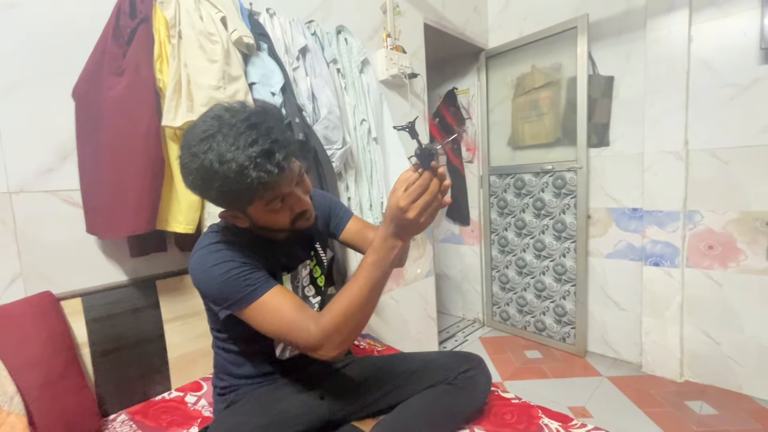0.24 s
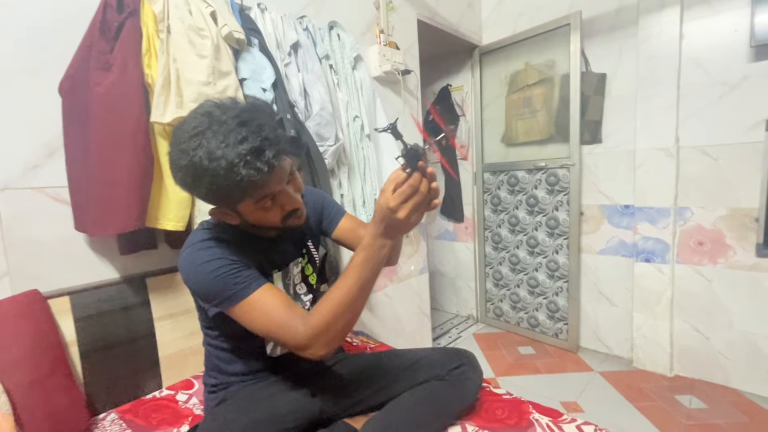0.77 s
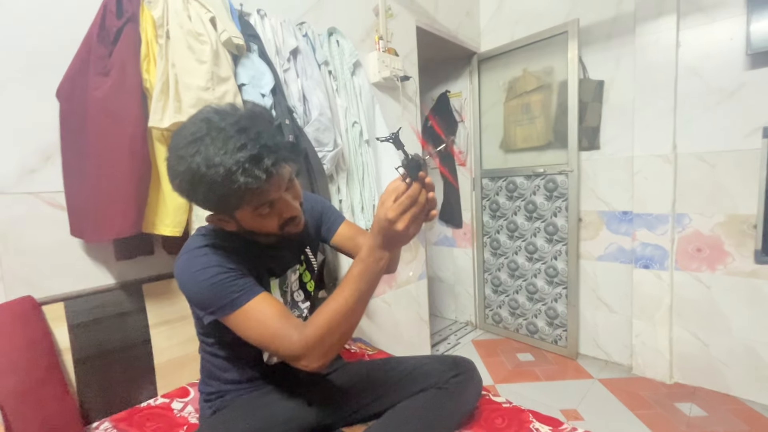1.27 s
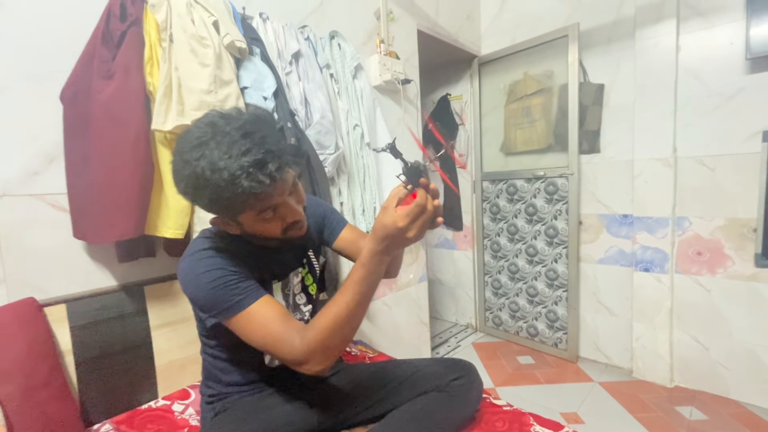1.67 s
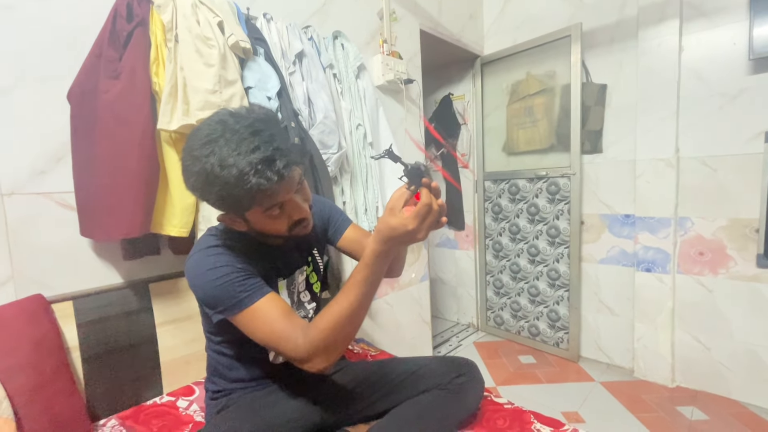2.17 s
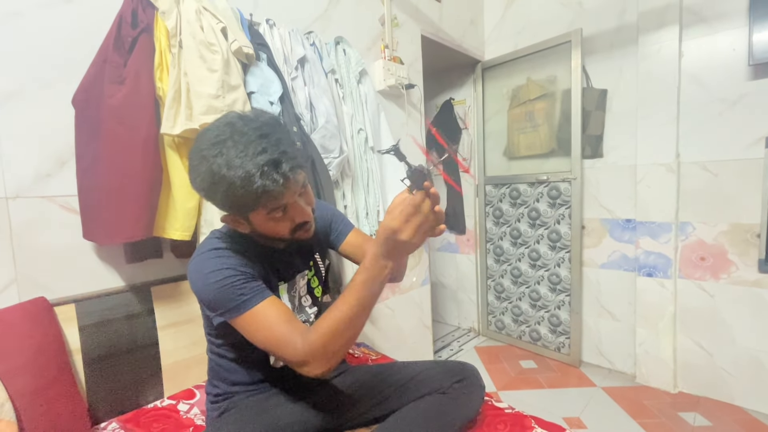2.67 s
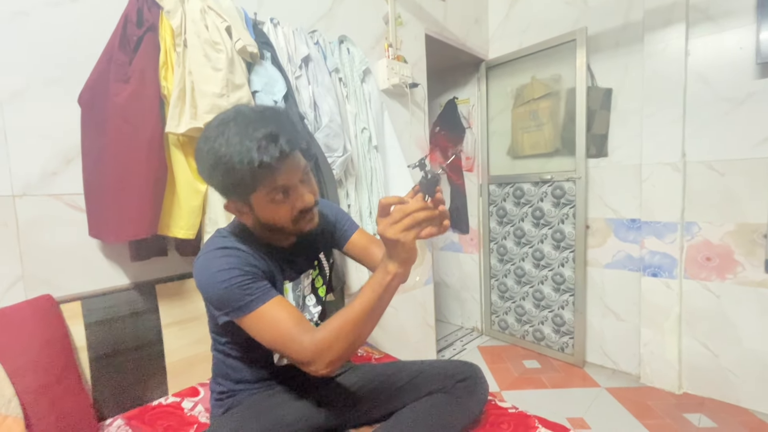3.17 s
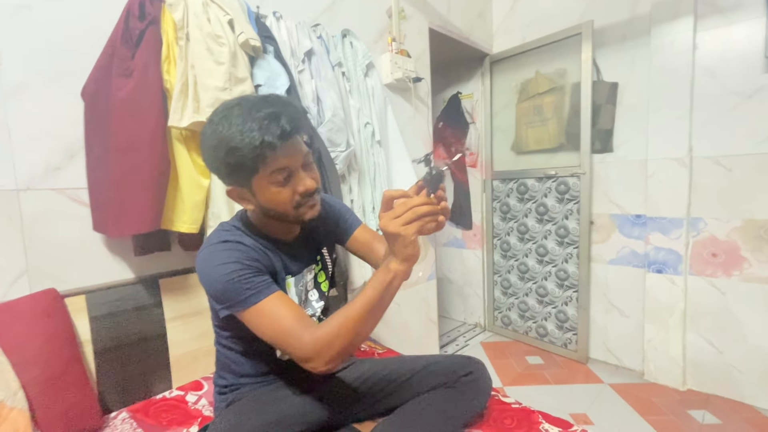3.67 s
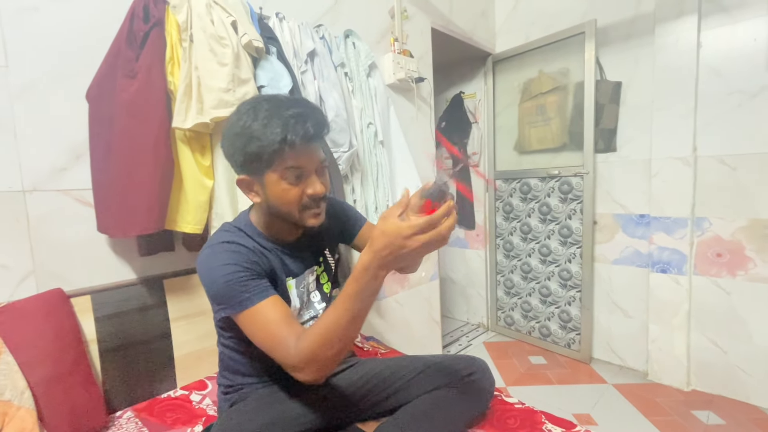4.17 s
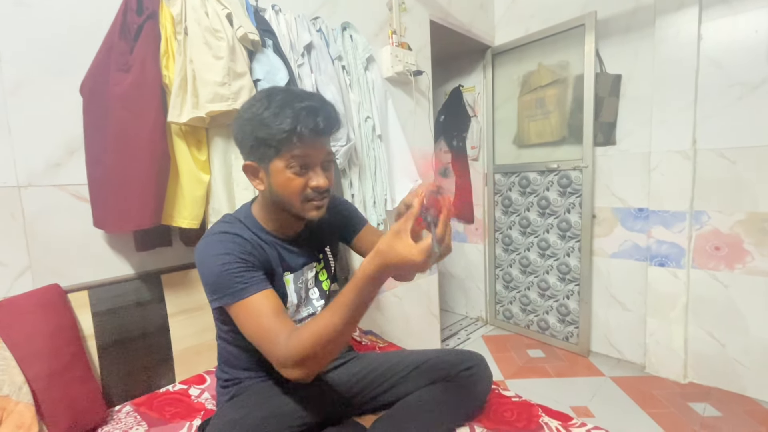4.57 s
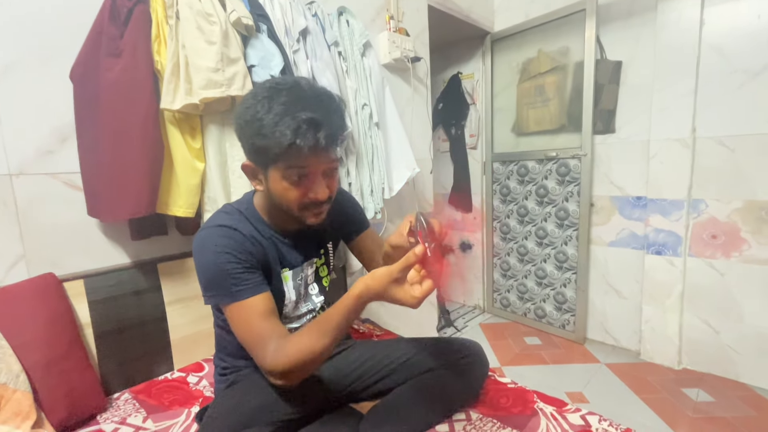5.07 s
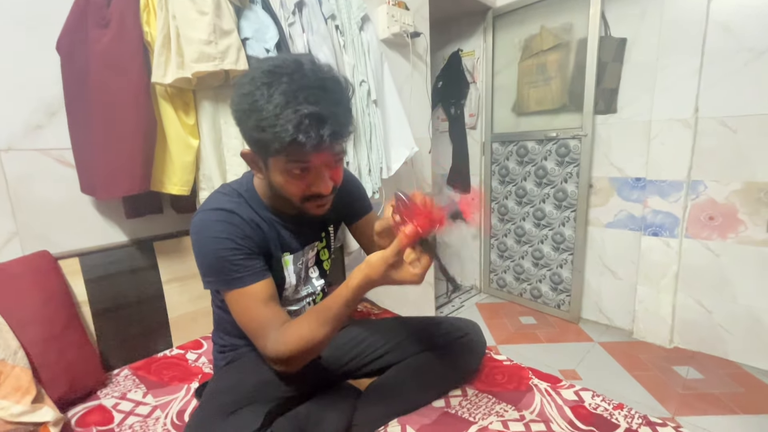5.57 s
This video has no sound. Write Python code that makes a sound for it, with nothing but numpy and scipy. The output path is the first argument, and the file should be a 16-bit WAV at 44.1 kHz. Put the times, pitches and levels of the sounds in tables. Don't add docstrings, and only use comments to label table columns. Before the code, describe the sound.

A small hand-held toy rotorcraft whirs close to a stereo microphone in a hard, tiled room, over a quiet low fan drone. Two thin gear whines, slightly apart in pitch, beat and waver with raspy buzz and airy rotor hiss. The pitch stays near one level at first, with a brief rise around 1.3 seconds and a dip near 1.6. At about 2.9 seconds it jumps higher and smoother, with a piercing squeal on top; four rapid dull finger taps come near 3.45. From 3.75 the whine sinks, growing shaky and strained after 4.2, then briefly surges upward before power cuts at about 4.7. The driven tone vanishes quickly, leaving a breathy, scraping whir with short bursts of gear rattle until about 5.1, fading as it slows. At roughly 5.8 seconds a sharp switch snap rings with tiny bounces, leaving only the fan's faint drone.

```python
import sys
import numpy as np
from scipy import signal
from scipy.fft import rfft, irfft
from scipy.io import wavfile

SR = 44100
rng = np.random.default_rng(int(sys.argv[2]) if len(sys.argv) > 2 else 0)


def store_wav(level_fs):
    pcm = np.round(np.clip(np.atleast_2d(level_fs), -1, 1) * 32767)
    wavfile.write(sys.argv[1], SR, pcm.T.astype(np.int16))


def rack_gain(trim_db):
    fader = np.asarray(trim_db, float)
    return 10 ** (fader / 20)


N = 256794
TIME_S = np.arange(N) / SR
BIN_HZ = np.fft.rfftfreq(N, 1 / SR)

POWER_OFF_S = 4.728
SINCE_OFF_S = np.clip(TIME_S - POWER_OFF_S, 0, None)
TEETH = 8
# hz, level_db_per_hz
SHELL_COLOUR = [(290, -23.5), (500, -17), (900, -25), (1350, -13.5), (1800, -12), (2300, -18.5),
                (2600, -12), (2900, -7), (4400, -6.5), (6500, -2), (10000, -7), (13300, -6.5),
                (13900, -5.5), (15200, -21.5)]


def rms_one(x):
    return x / np.sqrt(np.mean(x ** 2) + 1e-20)


def in_time(rows):
    start_s, *columns = np.transpose(rows)
    return [np.interp(TIME_S, start_s, column) for column in columns]


def at_hz(points, hz):
    point_hz, value = np.array(points)[:, :2].T
    return np.interp(np.log(hz + 1), np.log(point_hz), value)


def drift(rate_hz):
    r = np.exp(-2 * np.pi * rate_hz / SR)
    noise = rng.standard_normal(N + SR)
    return rms_one(signal.lfilter([1], [1, -2 * r, r * r], noise)[SR:])


def low_pass(x, order, cutoff_hz):
    return signal.sosfilt(signal.butter(order, cutoff_hz, fs=SR, output="sos"), x)


def high_pass(x, cutoff_hz):
    return signal.sosfilt(signal.butter(4, cutoff_hz, "high", fs=SR, output="sos"), x)


def resonate(x, hz, width_hz):
    r = np.exp(-np.pi * width_hz / SR)
    feedback = [1, -2 * r * np.cos(2 * np.pi * hz / SR), r * r]
    return signal.lfilter([(1 - r * r) / 2, 0, (r * r - 1) / 2], feedback, x)


def strike(start_s, peak_db, hz, t60_s):
    out, start = np.zeros(N), round(start_s * SR)
    t = np.arange(min(N - start, SR // 5)) / SR
    decay = rack_gain(peak_db - 60 * t / np.clip(t60_s, .002, .2))
    out[start:start + len(t)] = decay * np.sin(2 * np.pi * hz * t)
    return out


def coloured(spectrum, patchy_db, channels):
    bins = rfft(rng.standard_normal((channels, N))) * rack_gain(at_hz(spectrum, BIN_HZ))
    octave = np.clip(np.log2(BIN_HZ / 125 + 1e-9), 0, 7)
    total = 0
    for k in range(8):
        band = irfft(bins * np.sqrt(np.clip(1 - abs(octave - k), 0, 1)), N)
        total = total + band * rack_gain(patchy_db * drift(15.5))
    return rms_one(total)


def bells(rows):
    return sum(rack_gain(db) * np.exp(-((TIME_S - s) / half_length_s) ** 2) for s, db, half_length_s in rows)


def turn_angle(turns_per_s):
    return 2 * np.pi * np.cumsum(turns_per_s) / SR


def gears():
    # start_s, lead_turns_per_s
    second_lead = [(0, 25), (1, 26), (1.1, 21), (1.5, 22), (1.65, 26), (2.1, 26), (2.3, 21), (2.45, 21),
                   (2.6, 26), (2.9, 22.5), (4.07, 22.5), (4.4, 12)]
    # start_s, relative_tremble, roughness_db
    strain = [(0, .0008, 0), (2.85, .0008, 0), (2.95, .004, 2), (3.2, .0012, 0), (4.05, .0014, 0),
              (4.3, .007, 4), (4.55, .015, 8), (4.73, .006, 4)]
    powered = shaft_speed()
    tremble, strain_db = in_time(strain)
    speed = powered * np.exp(-SINCE_OFF_S / .32)
    second_speed = powered + in_time(second_lead)[0]
    angle = turn_angle(speed * (1 + tremble * drift(23.2)))
    second = turn_angle(second_speed * (1 + 2.5 * tremble * drift(26.4)))
    smooth = 1 / (1 + np.exp((462 - powered) / 4))
    loaded = np.exp(-SINCE_OFF_S / .004)
    humps = tooth_humps(angle)
    tones = mesh_tones(angle, second) + side_tones(angle, speed, smooth, strain_db)
    pressing = 1.104 * tones + rasp(humps, smooth, strain_db) + squeal(angle, second)
    return loaded * pressing + (1 - loaded) * coasting(angle, powered, humps)


def shaft_speed():
    # start_s, aim_turns_per_s, lag_s
    throttle = [(0, 386, .15), (.365, 422.5, .12), (.9, 419.9, .06), (1.24, 458, .05), (1.538, 387, .125),
                (2.012, 420.8, .12), (2.66, 419.4, .05), (2.89, 481, .113), (3.33, 473, .15),
                (3.75, 430, 1.1), (4.08, 380, .45), (4.275, 335, .26), (4.585, 560, .33)]
    speed = np.full(N, 422.7)
    for start_s, aim, lag_s in throttle:
        i = round(start_s * SR)
        speed[i:] = aim + (speed[i] - aim) * np.exp(-(TIME_S[i:] - start_s) / lag_s)
    return speed


def mesh_tones(angle, second):
    # peak_s, level_db, half_length_s
    first_sings = [(.13, -24, .05), (.35, -24, .05), (.72, -21, .16), (.95, -25, .1), (1.17, -20, .1),
                   (1.85, -29, .1), (2.3, -25, .2), (2.88, -18, .11), (3.15, -32, .07), (3.79, -19, .11),
                   (4.1, -23, .12), (4.42, -18, .03), (4.58, -21, .06)]
    # peak_s, level_db, half_length_s
    second_sings = [(.05, -28, 0.34), (.83, -23, 0.085), (1.45, -24, 0.069), (2.83, -40, 0.09),
                    (3.2, -28.5, 0.38), (3.62, -26, 0.081), (4.07, -28, 0.024), (4.24, -18, .03),
                    (4.36, -16.5, 0.021), (4.54, -36, 0.024), (4.66, -16, 0.024)]
    first_gain = (rack_gain(-31.5) + bells(first_sings)) * rack_gain(1.3 * drift(20))
    second_gain = (rack_gain(-30) + bells(second_sings)) * rack_gain(2.5 * drift(15.0) - 6.5)
    second_wave = np.sin(TEETH * second) + rack_gain(-41) * np.sin(2 * TEETH * second)
    return first_gain * np.sin(TEETH * angle) + second_gain * second_wave


def side_tones(angle, speed, smooth, strain_db):
    side_order = [1, 3.46, 4, 5, 6.094, 7, 11, 12.19, 14, 15, 16, 17]
    side_order_db = [-18, -19, -17, -11, -8, -7, -15, -13, -6, -3, -3, -7]
    tones = 0
    for k, order_db in zip(side_order, side_order_db):
        mode_db = 8 * np.exp(-((k * speed - 2735) / 75) ** 2)
        shell_db = at_hz(SHELL_COLOUR, k * speed) + mode_db - strain_db
        blur_db = -5 * (1 - smooth) * (k > 1.5 * TEETH)
        level_db = order_db + blur_db + shell_db - 21.0 + 3.03 * drift(16.5)
        tones = tones + rack_gain(level_db) * np.sin(k * angle + rng.uniform(0, 3.94))
    commutator = rack_gain(-41 - 2 * strain_db + 1.1 * drift(13.0)) * np.sin(3.047 * angle)
    boom = rack_gain(-47) * resonate(np.sin(angle), 476, 25)
    return tones + commutator + boom


def tooth_humps(angle):
    hump_order = [7.9, 14.5, 16.4]
    # half_width_hz, level_db
    hump_shape = [(306, -2), (648.15, 0.5), (410, 4.5)]
    humps = []
    for k, (width_hz, level_db) in zip(hump_order, hump_shape):
        wave = drift(width_hz) * np.sin(k * angle) + drift(width_hz) * np.cos(k * angle)
        humps.append(rack_gain(level_db) * wave)
    return humps


def rasp(humps, smooth, strain_db):
    level_db = -20.5 - 9 * smooth + 1 * drift(1.3)
    case = rack_gain(-0.5) * resonate(sum(humps[1:]), 6600, 2800)
    return rack_gain(level_db - 6.5) * (rack_gain(strain_db) * humps[0] + case)


def squeal(angle, second):
    rise_s, fall_s, edge_s = 2.65, 4.1, 0.088
    raised = np.tanh((TIME_S - rise_s) / edge_s) - np.tanh((TIME_S - fall_s) / edge_s)
    level_db = -31 + 7.5 / 2 * raised
    first_third = (0.45 + drift(240)) * np.sin(3 * TEETH * angle)
    second_third = (0.11 + 2.0 * drift(380)) * np.sin(3 * TEETH * second)
    return rack_gain(level_db - 0.5) * resonate(first_third + second_third, 11440, 340)


def coasting(angle, powered, humps):
    sliding = drift(410) * np.sin(2 * TEETH * angle) + drift(500) * np.cos(2 * TEETH * angle)
    sliding = high_pass(sliding + .5 * humps[0], 2600)
    sliding_db = -30.5 - 23 * SINCE_OFF_S + 4.1 * drift(30)
    held = turn_angle(powered * .98)
    fade = rack_gain(-23) * np.exp(-SINCE_OFF_S / 0.026)
    lingering = fade * (1 + 0.36 * drift(60)) * np.sin(TEETH * held)
    return rack_gain(sliding_db) * sliding + lingering


def rush():
    # start_s, level_db
    rush_level = [(0, -17.5), (4.2, -16), (4.55, -18.5), (4.72, -17), (4.78, -20.5), (4.85, -14),
                  (5.05, -14), (5.2, -20.5), (5.82, -37)]
    hiss = coloured(SHELL_COLOUR, patchy_db=1.0, channels=3)
    dull = low_pass(hiss, 2, 5500)
    bright = np.exp(-SINCE_OFF_S / 0.32)
    brush_loss_db = -7 * (1 - np.exp(-SINCE_OFF_S / 0.0023))
    chop = 1 + 0.12 * drift(240)
    return rack_gain(in_time(rush_level)[0] + brush_loss_db - 8.5) * chop * (dull + bright * (hiss - dull))


def backlash():
    # peak_s, level_db, half_length_s
    knock_bursts = [(4.756, -47, 0.01), (4.783, -25.5, 0.01), (4.823, -20, 0.017), (4.876, -24, 0.0068),
                    (4.905, -29, 0.0082), (4.984, -27, 0.015), (5.012, -30, 0.01), (5.05, -42, 0.011),
                    (5.124, -35, .01)]
    sizes = rack_gain(2.4 * np.minimum(rng.exponential(1, N), 4)) * rng.choice([-1, 1], N)
    impacts = sizes * (rng.random(N) < 2500 / SR) + 1e-18
    shell = resonate(impacts, 2880, 360) - 0.67 * resonate(impacts, 4830, 720)
    shell = shell + 0.25 * resonate(impacts, 8700, 1600)
    standstill_s = 5.43
    rattle_db = -29 - 50 * np.clip(TIME_S - standstill_s, 0, None) - 13
    return (bells(knock_bursts) + rack_gain(rattle_db) * (TIME_S > POWER_OFF_S)) * rms_one(shell)


def finger_knocks():
    # start_s, peak_db, ring_hz, t60_s
    finger_hits = [
        (3.4208, -17, 1440, 0.036),
        (3.4391, -16.5, 1480, 0.024),
        (3.4505, -18, 1450, 0.015),
        (3.462, -18, 1510, 0.02),
        (3.4783, -31, 1450, 0.014),
    ]
    knocks = 0
    for start_s, peak_db, hz, t60_s in finger_hits:
        knocks = knocks + strike(start_s, peak_db, hz, t60_s)
        knocks = knocks + strike(start_s, peak_db - 21, 1.1 * hz, 0.0035)
    return knocks


def switch_click():
    # start_s, peak_db, treble_db_per_khz
    contacts = [
        (5.7722, -31, 0),
        (5.7832, -25, -1),
        (5.7861, -11, .9),
        (5.7869, -3, -.2),
    ]
    # mode_hz, level_db, t60_s
    switch_modes = [(3000, -13, .008), (4200, -5, .009), (4750, 0, .006), (5400, -2, .008),
                    (6300, -6, .005), (7400, -9, .004), (9800, -10, .004), (12600, -10, .004),
                    (14500, -12, .003)]
    bounce = np.arange(10)
    bounce_s = contacts[-1][0] + np.cumsum(.0015 * 1.135 ** bounce)
    bounces = list(zip(bounce_s, -12 - .9 * bounce, -.13 * bounce))
    click = 0
    for start_s, peak_db, treble_db in contacts + bounces:
        chance = rng.standard_normal((len(switch_modes), 2))
        for (hz, mode_db, t60_s), (louder, higher) in zip(switch_modes, chance):
            level_db = peak_db + mode_db + treble_db * (hz / 1000 - 4.7) + 1.9 * louder - 9
            click = click + strike(start_s, level_db, hz * (1 + higher / 30), t60_s)
    return click


def room(x):
    t60_s, tail_db, wall_cut_hz = .35, -9, 8000
    t = np.arange(SR // 2) / SR
    tail = rng.standard_normal((2, len(t))) * rack_gain(-60 * t / t60_s) * (t > .003)
    tail = low_pass(tail, 2, wall_cut_hz)
    tail = tail / np.sqrt(np.sum(tail ** 2) / 2)
    return rack_gain(tail_db) * signal.fftconvolve(x[None], tail, axes=1)[:, :N]


def fan():
    # hz, level_db_per_hz
    fan_colour = [(15, -59), (25, -45), (69, -9.5), (101, -4), (139, -16), (231, -27.5), (278, -16.5),
                  (475, -22.5), (515, -17.5), (1120, -19.5), (1210, -14.5), (1760, -20.5), (2180, -19),
                  (2560, -21.5), (15000, -42.5)]
    # hz, likeness
    fan_likeness = [(60, 0.73), (99, 0.63), (160, 0.095), (270, 0.83), (440, 0.8), (730, -0.092),
                    (1200, 0.61), (1980, -1.35), (3260, 0.89), (5370, -0.75), (8850, 0.06), (14600, 0.15)]
    # hz, width_hz, level_db
    fan_hum = [(73.2, 7.2, -3.5), (57.4, 7.7, -6.5), (128, 7.4, -13.5), (246.4, 15.3, -19)]
    # peak_s, level_db, half_length_s
    hum_swells = [(.3, -35.5, 0.76), (1.33, -49, 0.021), (1.87, -34, 0.037), (2.13, -40, 0.061),
                  (2.44, -32.5, 0.054), (3.3, -39, 0.12), (4.28, -33.5, .17), (4.73, -50, 0.04),
                  (5.58, -40, 0.44)]
    mid, side = coloured(fan_colour, patchy_db=-2.5, channels=2)
    alike = np.clip(at_hz(fan_likeness, BIN_HZ), 0, 1)
    mid = irfft(rfft(mid) * np.sqrt(1 + alike), N)
    side = irfft(rfft(side) * np.sqrt(1 - alike), N)
    air = rack_gain(-35 - 4.5) * (mid + side * [[1], [-1]])
    hums = 0
    for hz, width_hz, level_db in fan_hum:
        phase = 2 * np.pi * hz * TIME_S + 0.74 * drift(width_hz)
        hums = hums + rack_gain(level_db + 2.7 * drift(width_hz)) * np.sin(phase)
    return air + (rack_gain(-35.5) + bells(hum_swells)) * hums


def scene():
    # hz, left_lead_rad
    port_phase = [(30, 0), (1400, .4), (2150, -3.5), (2700, -5.1), (3500, -5.5), (4300, -7.0), (5600, -7.7),
                  (8600, -7.8), (9600, -11.2), (14300, -11.5)]
    hiss = rush()
    toy = gears() + backlash() + finger_knocks() + switch_click()
    half_lead = at_hz(port_phase, BIN_HZ) / 2
    direct = irfft(rfft(toy + hiss[0]) * np.exp(1j * half_lead * [[1], [-1]]), N)
    scattered = rack_gain(6.5) * low_pass(hiss[1:], 2, 10000)
    return direct + room(toy) + scattered + fan()


def roll_off(x):
    return signal.sosfilt(signal.butter(12, 15180, fs=SR, output="sos"), x)


def record(dry):
    # hz, left_minus_right_db
    port_balance = [(60, 4.5), (180, 1), (540, 2.5), (1620, 3), (4860, 3.5), (14600, -1.5)]
    tilt_db = at_hz(port_balance, BIN_HZ) / 2
    x = irfft(rfft(dry) * rack_gain(tilt_db * [[1], [-1]]), N)
    x = high_pass(x, 44)
    x = 1.34 * np.tanh(x / 1.078)
    return roll_off(x)


dry = scene()
out = record(dry)
store_wav(out)
```